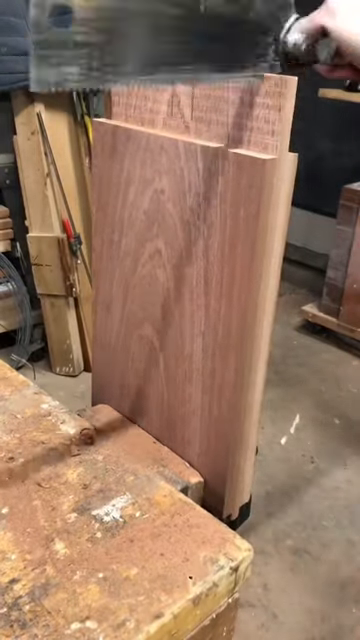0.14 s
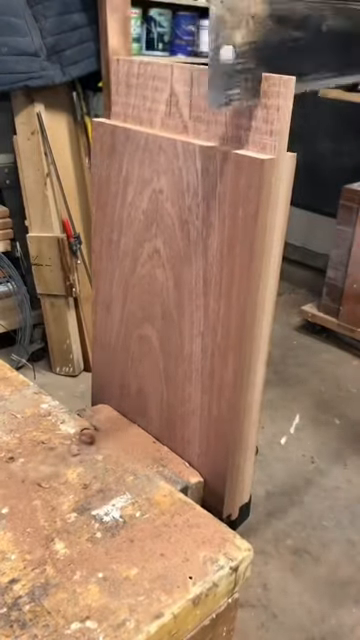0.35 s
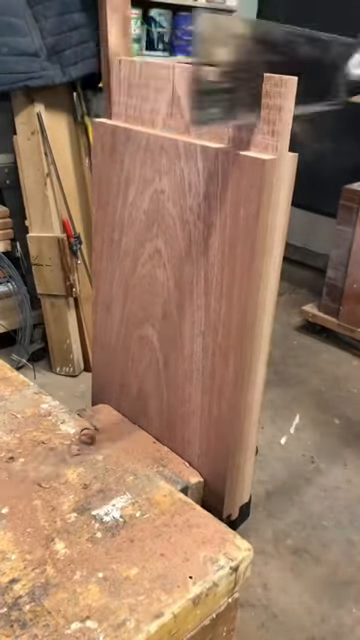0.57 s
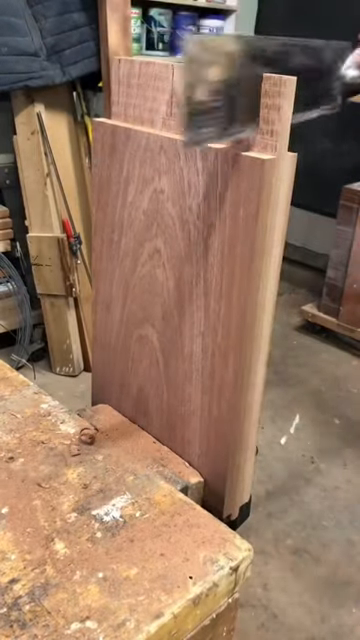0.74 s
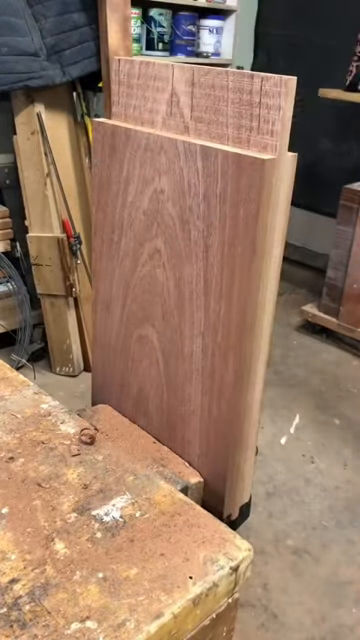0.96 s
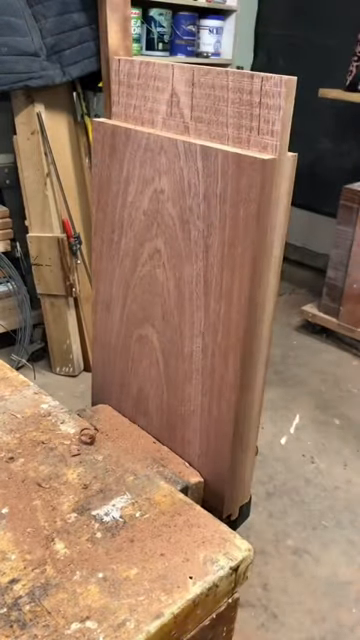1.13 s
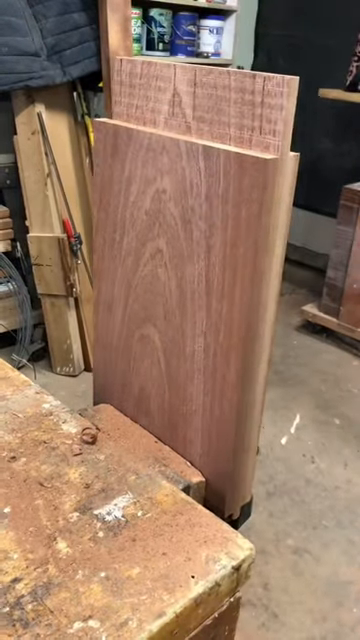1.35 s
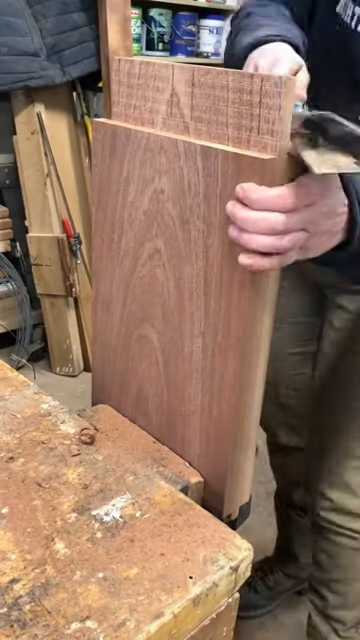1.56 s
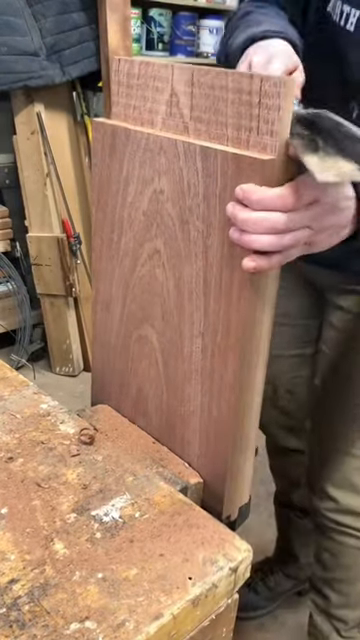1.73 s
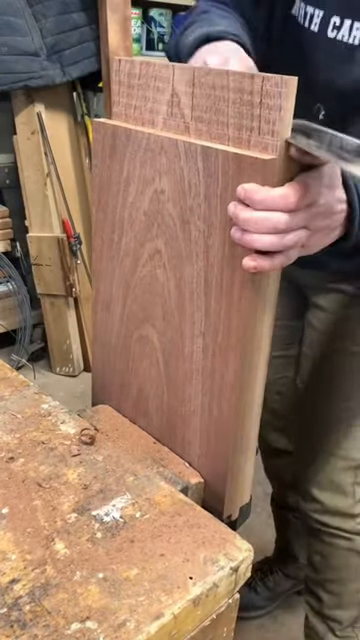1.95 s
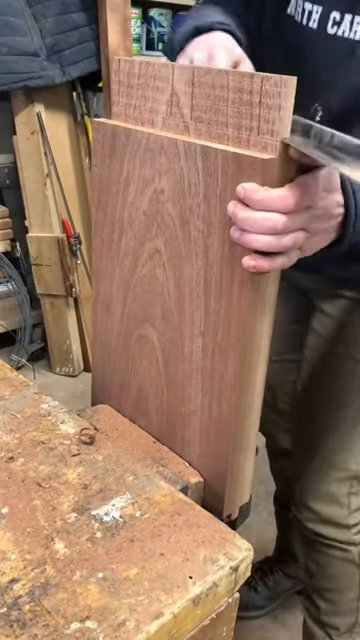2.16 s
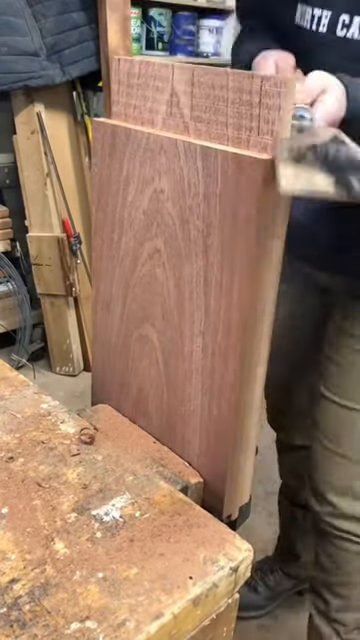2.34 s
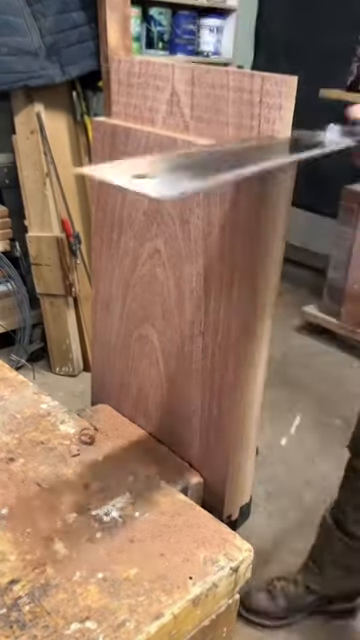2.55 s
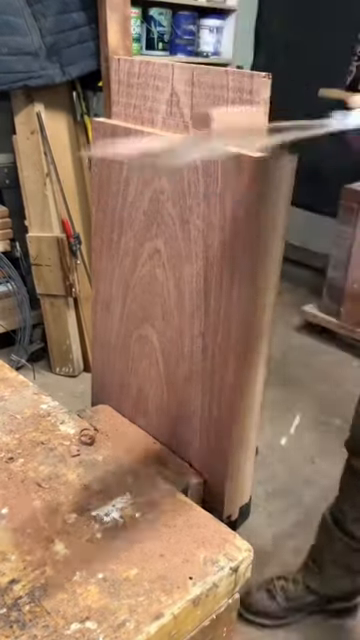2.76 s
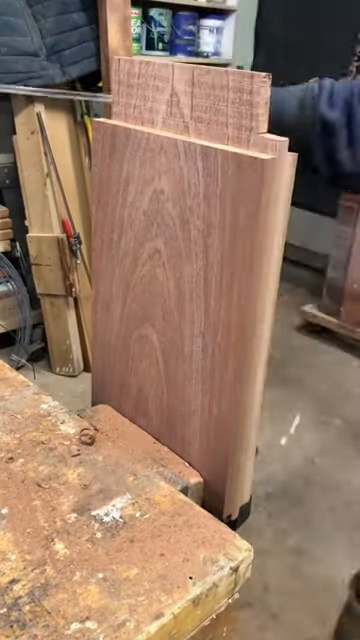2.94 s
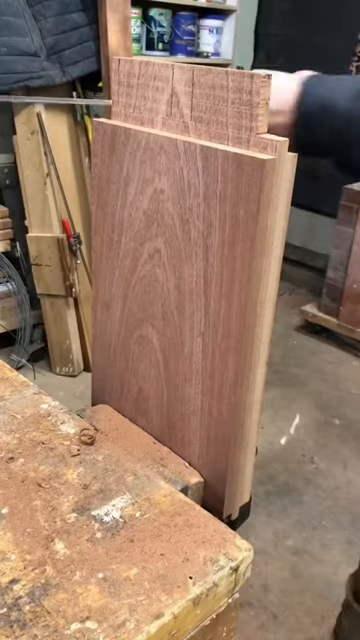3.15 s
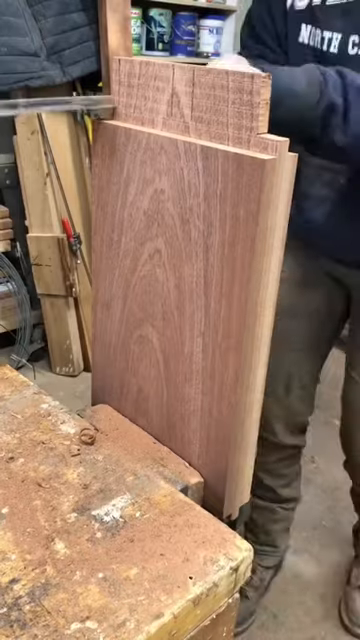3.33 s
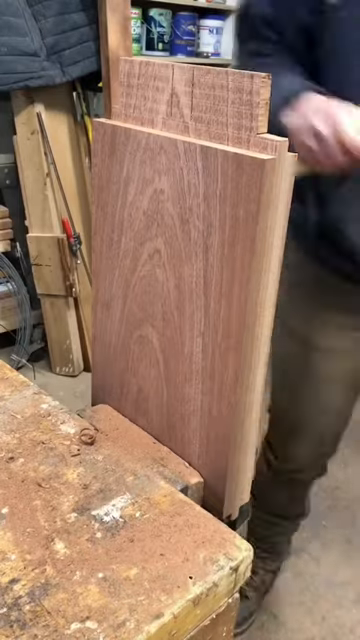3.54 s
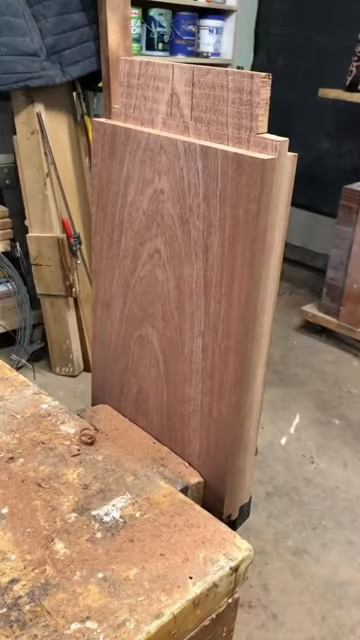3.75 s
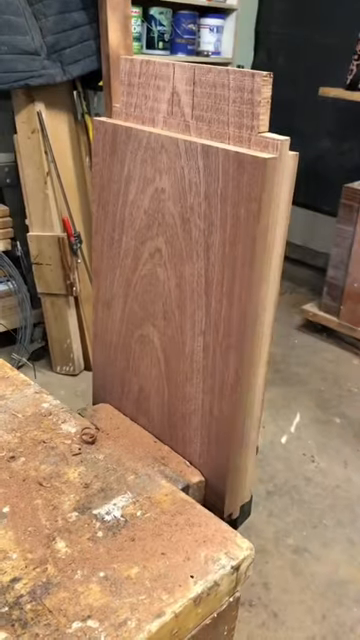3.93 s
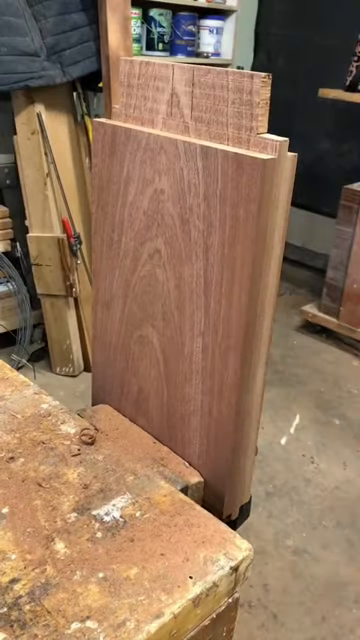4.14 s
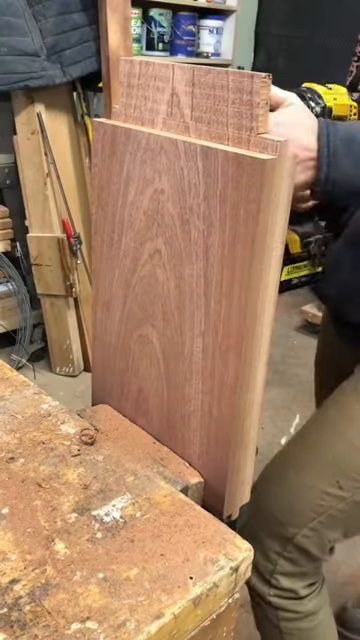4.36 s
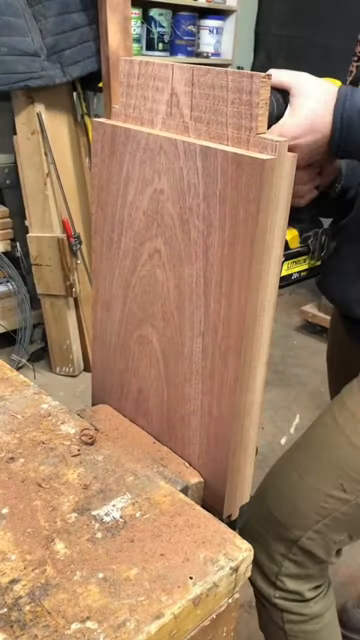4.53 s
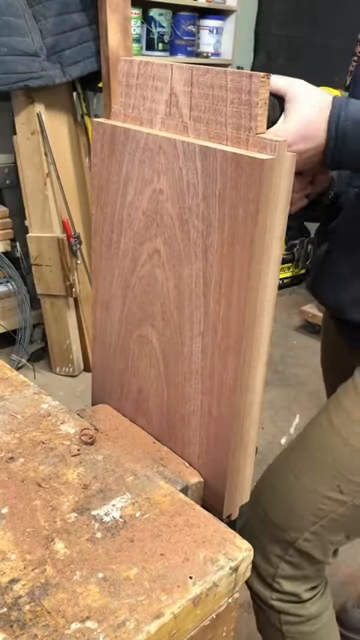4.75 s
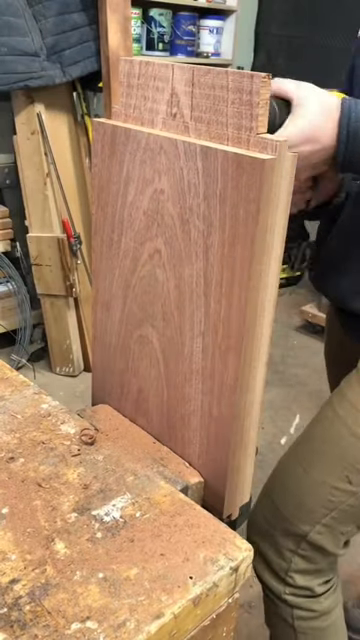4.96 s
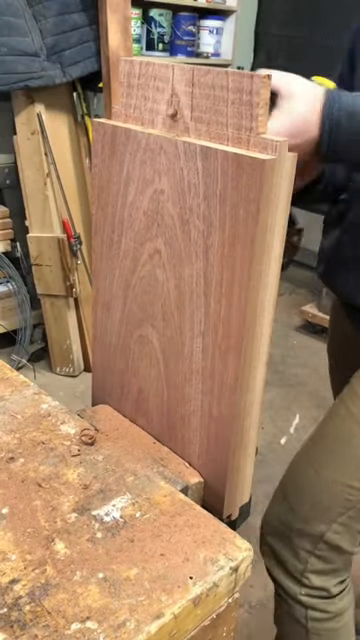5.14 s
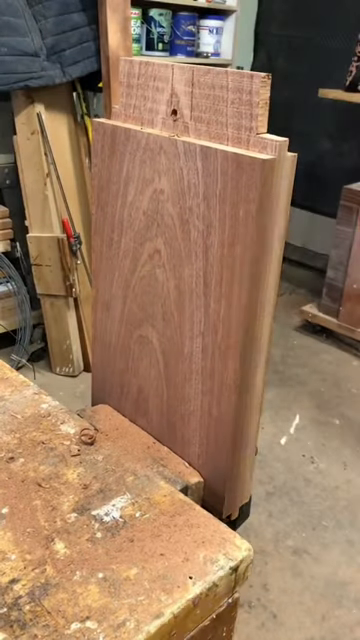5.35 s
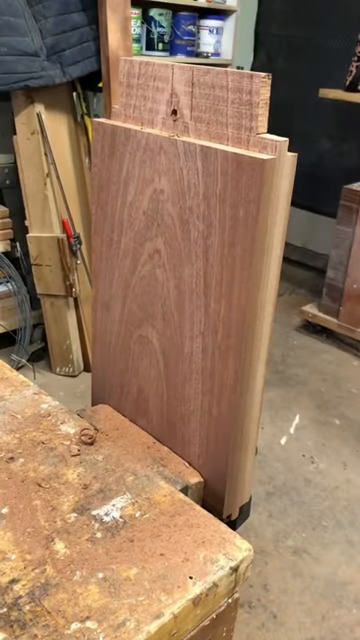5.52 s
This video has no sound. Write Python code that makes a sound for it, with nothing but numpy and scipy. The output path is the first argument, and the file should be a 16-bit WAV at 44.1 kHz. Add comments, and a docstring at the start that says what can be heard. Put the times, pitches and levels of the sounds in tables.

```python
"""Sped-up woodwork in a small workshop, over a steady, faintly whining hiss.
First a thin hand saw makes four cuts in a clamped board: very fast strokes, whose teeth rasp the wood
and ring the blade. Thumps and steel ticks fall among them. Then a cordless drill bores a hole and backs out:
its motor and gears whine, its chuck rattles and its bit tears chips. A few light taps end the scene.
Notes are sines or fuzzy lines; rasps, hisses and knocks are noise or snaps sent through resonances."""
import sys
import numpy as np
from scipy import signal
from scipy.fft import rfft, irfft, next_fast_len
from scipy.io import wavfile
from scipy.ndimage import map_coordinates

SR = 44100
rng = np.random.default_rng(int(sys.argv[2]) if len(sys.argv) > 2 else 0)


def master_out(mix):
    """Clip the mix to full scale and print it as 16-bit PCM to the path in sys.argv[1]."""
    frames = np.transpose(np.atleast_2d(mix))
    ceiling = np.clip(frames, -1, 1)
    pcm = np.round(ceiling * 32767).astype(np.int16)
    wavfile.write(sys.argv[1], SR, pcm)


N = 250929
T = np.arange(N) / SR  # time of each sample in seconds


def amp(db):
    """Turn decibels into a plain multiplier."""
    return 10 ** (np.asarray(db) / 20)


def unit(x):
    """Scale a sound to rms 1."""
    return x / np.sqrt(np.mean(x ** 2) + 1e-20)


def noise():
    """White noise of rms 1 for the whole scene."""
    return rng.standard_normal(N)


def wobble(rate):
    """A smooth random curve, rate knots a second."""
    knots = rng.standard_normal(int(N * rate / SR) + 4)
    return map_coordinates(knots, [T * rate])


def curves(rows):
    """One value per sample for each column after the time, gliding from row to row."""
    seconds, *columns = np.transpose(rows)
    return [np.interp(T, seconds, column) for column in columns]


def body(colour, modes=(), band=(1, SR)):
    """Causal impulse response of energy 1: a broad colour, lifted at each resonance, within a band."""
    hz = np.fft.rfftfreq(8192, 1 / SR) + 1
    colour_hz, colour_db = np.transpose(colour)
    db = np.interp(np.log(hz), np.log(colour_hz), colour_db)
    db += sum(lift / (1 + (2 * (hz - centre) / width) ** 2) for centre, width, lift in modes)
    low_edge, high_edge = 1 + (band[0] / hz) ** 16, 1 + (hz / band[1]) ** 16
    gain = amp(db - db.max()) / np.sqrt(low_edge * high_edge)
    # folding the cepstrum puts the energy as early as possible (minimum phase)
    cepstrum = irfft(np.log(gain + 1e-5))
    half = len(cepstrum) // 2
    cepstrum[1:half] *= 2
    cepstrum[half + 1:] = 0
    response = irfft(np.exp(rfft(cepstrum)))[:half]
    return response / np.linalg.norm(response)


def through(x, response):
    """Let a sound drive a resonating thing."""
    return signal.fftconvolve(x, response)[:N]


def tone(hz, waver=.5):
    """A sine of rms 1 with an unsteady phase."""
    return np.sqrt(2) * np.sin(2 * np.pi * np.cumsum(hz) / SR + waver * wobble(200))


def narrow(hz, width):
    """A fuzzy line of rms 1 that follows a moving frequency."""
    phase = 2 * np.pi * np.cumsum(hz) / SR
    return unit(wobble(width) * np.cos(phase) + wobble(width) * np.sin(phase))


# Broad colour of the hiss. Each row: frequency in Hz, relative level in dB.
AIR_COLOUR = [(30, -46.5), (130, -43.5), (280, -27.5), (400, -22.5), (500, -3), (1000, -9.5), (2000, 4),
              (3500, 5.5), (5500, -0.5), (7200, -8.5), (9500, -7.5), (12000, -10), (15500, -8)]
# Resonances in the hiss. Each row: frequency in Hz, width in Hz, lift in dB.
AIR_RESONANCES = [(580, 120, 6), (762, 150, 17.5), (1134, 110, 13.5), (2644, 214, 13), (6400, 400, 6.5),
                  (8230, 1400, 8), (11750, 2400, 9)]
# Notes of the running machine. Each row: frequency in Hz, level in dB.
MACHINE_NOTES = [(523, -74), (6298, -77.5), (9426, -87.5), (9948, -94), (10476, -75), (10998, -66),
                 (13614, -77)]


def workshop():
    """Steady hiss with a few room resonances and the thin whine of a running machine."""
    hiss = amp(-53.0 + 0.18 * wobble(13)) * through(noise(), body(AIR_COLOUR, AIR_RESONANCES))
    whine = np.zeros(N)
    for hz, db in MACHINE_NOTES:
        level = amp(db + 0.91 * wobble(8.0))
        whine += level * np.sqrt(2) * np.sin(2 * np.pi * hz * T + .5 * wobble(5.3))
    return hiss + whine


def room(x, t60=0.083):
    """The short answer of the crowded walls: a burst of noise that fades by 60 dB in t60 seconds."""
    t = T[:SR // 4]
    tail = rng.standard_normal(len(t)) * amp(-60 * t / t60) * (t > .002)
    return through(x, tail / np.linalg.norm(tail))


# Resonances of the board, then of the blade. Each row: frequency in Hz, width in Hz, lift in dB.
BOARD_RESONANCES = [(585.5, 44, 4.5), (579, 119, 16), (812, 245, 18), (1026, 47, 10), (1202, 24, 7),
                    (1260, 125, 10), (1460, 73, 9), (1570, 108, 10), (1720, 66, 11), (2053, 260, 9),
                    (2380, 45, 5), (2447, 69, 8.5), (3010, 280, 9), (3385, 78, 12), (3822, 156, 12),
                    (4150, 137, 10), (4670, 220, 9), (5216, 270, 8.5)]
BLADE_RESONANCES = [(7210, 95, 7), (7700, 42, 3.1), (7730, 70, 4.9), (7810, 380, 7.5), (7876, 160, 4.7),
                    (8500, 43, 2.4), (8290, 150, 9.1), (9100, 190, 2.4), (9550, 120, 3), (9990, 260, 1.6),
                    (10050, 390, 2.2), (10180, 550, 6.4), (10940, 220, 1.7), (11100, 230, 3.3)]
# Thumps in the board: bumps of tools and hands, a hard bite of the saw, chatter of the drill bit.
# Each row: start in seconds, level in dB, time to fade 60 dB in seconds.
BOARD_THUMPS = [(.49, -32, 0.028), (.562, -32.5, .033), (1.553, -40.5, 0.03), (3.09, -44, 0.088),
                (3.128, -30, 0.039), (3.66, -52, 0.043), (4.127, -49, 0.033), (4.242, -51, .03),
                (4.841, -41.5, 0.032), (5.065, -47, .13), (5.111, -41.5, 0.12), (5.164, -31, 0.04),
                (5.4, -48.5, 0.047), (5.437, -42, 0.037), (5.47, -46, 0.027)]
# Sharp ticks of steel. Each row: start in seconds, level in dB.
STEEL_TICKS = [(.374, -37.5), (0.392, -32), (0.56, -26), (2.809, -33), (2.821, -34.5), (2.877, -46),
               (4.84, -45), (4.936, -43), (5.007, -44), (5.532, -49)]
THUMP_RISE = 0.045  # longer-fading thumps rise more slowly: rise time as a share of the fade time


def knocks(tick_t60=0.0087):
    """Thumps are short bursts of force into the board; ticks ring the steel."""
    thumps, ticks = np.zeros((2, N))
    for start, db, t60 in BOARD_THUMPS:
        age = (T - start) / t60
        thumps += amp(db - 60 * np.maximum(age - THUMP_RISE, 0)) * np.clip(age / THUMP_RISE, 0, 1)
    for start, db in STEEL_TICKS:
        ticks += amp(db - 60 * np.abs(T - start) / tick_t60) * (T >= start)
    wood_colour = [(200, -31.5), (550, -4.5), (850, -6.5), (1500, -1.0),
                   (4000, -3.0), (9000, -2.5), (15000, -18.5)]
    steel_colour = [(300, -33), (700, -21), (5000, -16), (8000, -1.0), (14000, -5.5)]
    wood = body(wood_colour, BOARD_RESONANCES)
    steel = body(steel_colour, BLADE_RESONANCES)
    return through(thumps * noise(), wood) + through(ticks * noise(), steel)


# Trigger pulls. Each row: start in seconds, end in seconds, gear level in dB, starting rattle in dB.
TRIGGER_PULLS = [(4.038, 4.061, -53, -39), (4.39, 4.408, -48, -46), (4.432, 4.909, -46, -47),
                 (4.958, 4.984, -47, -53), (5.043, 5.176, -46, -42)]
# The drill at work. Each row: time in seconds, gear whine in Hz, and the whine and
# boring levels in dB (each about 1 dB lower once mixed).
DRILL_WORK = [(4.41, 3803, -74, -62), (4.46, 3810, -59, -58), (4.51, 3793, -55.5, -46),
              (4.835, 3670, -52.5, -44.5), (4.85, 3560, -46, -42), (4.895, 3530, -42, -44.5),
              (4.915, 3330, -57, -54), (5.05, 3610, -64, -54), (5.12, 3910, -64, -43.5),
              (5.18, 3880, -62, -69)]
# Broad colours of the gear hiss and of the boring. Each row: frequency in Hz, relative level in dB.
GEAR_COLOUR = [(240, -61), (400, -37), (527, -18), (810, -10), (1380, -10.5), (1720, 1), (2330, -20),
               (3750, -4), (6120, -14.5), (8190, 3), (9410, -13), (13000, -3), (15600, -8.5)]
BORING_COLOUR = [(180, -86), (300, -51), (572, -21), (721, -22), (783, 0), (1110, -24), (1220, 3.5),
                 (1400, -25), (1730, -25), (2750, -2.5), (3640, -2), (6080, -10), (8190, 3), (9660, -4),
                 (15600, -6.5)]
# Resonances of the loose chuck. Each row: frequency in Hz, width in Hz, lift in dB.
CHUCK_RESONANCES = [(4940, 700, 15.5), (6530, 490, 9), (13100, 1100, 8)]
MOTOR_PER_WHINE, MOTOR_DB = .54, -59.5  # the motor's note is geared to the whine
SPIN_UP_S, START_SLOW = .068, .17  # at each pull the motor starts slow by this share
# the bit squeals as it breaks through: start, pitch, level and time to fade 60 dB
SQUEAL_S, SQUEAL_HZ, SQUEAL_DB, SQUEAL_T60 = 4.84, 4040, -45, 0.38


def drill(rise=0.0083, fall=0.0046, rattle_t60=0.16):
    """While the trigger is held the motor spins up, the gears hiss and whine, and the bit tears chips."""
    whine_hz, whine_db, boring_db = curves(DRILL_WORK)
    running, effort, jolt, starting = np.zeros((4, N))
    for start, end, gear_db, rattle_db in TRIGGER_PULLS:
        gate = np.clip((T - start) / rise, 0, 1) * np.exp(-np.maximum(T - end, 0) / fall)
        running += gate
        effort += gate * amp(gear_db)
        jolt += gate * amp(rattle_db - 60 * np.abs(T - start) / rattle_t60)  # each start shakes the chuck
        slowness = np.exp(-((T - start) / SPIN_UP_S) ** 4)
        starting = np.where(T >= start, slowness, starting)
    motor_hz = MOTOR_PER_WHINE * whine_hz * (1 - START_SLOW * starting)

    gears = amp(-1.0) * through(unit(noise() * amp(3 * wobble(900))), body(GEAR_COLOUR))
    gears += amp(-12) * narrow(3.48 * whine_hz, width=260)
    chuck_colour = [(300, -45), (2000, -12), (5000, -7.0), (15000, -4.0)]
    chuck = through(noise(), body(chuck_colour, CHUCK_RESONANCES))
    whine = amp(whine_db) * (0.92 * tone(whine_hz, waver=.2) + 0.2 * narrow(whine_hz, width=210))
    motor_overtone = amp(-2.5) * narrow(2.78 * motor_hz, width=180)
    motor = amp(MOTOR_DB) * (tone(motor_hz, waver=0.8) + motor_overtone)
    tearing = unit(noise() * amp(2.8 * wobble(1200)))
    chips = amp(boring_db - 1) * through(tearing, body(BORING_COLOUR))
    squeal_level = (T >= SQUEAL_S) * amp(SQUEAL_DB - 60 * np.abs(T - SQUEAL_S) / SQUEAL_T60)
    squeal = squeal_level * narrow(np.full(N, SQUEAL_HZ), width=450)
    return effort * gears + jolt * chuck + running * (whine + motor + chips + squeal)


# Broad colours of the rip cut, the light and the heavy part of the cross cut, and the last cut.
# Each row: frequency in Hz, relative level in dB.
RIP_TOP = [(280, -37), (400, -18.5), (560, -17), (1000, -11.5), (1600, -9.5), (2200, -5), (3300, -14.5),
           (4200, -10.5), (6200, -12), (7800, -3), (9200, -2), (10700, -3.5), (12500, -10), (15600, -10.5)]
CROSS_LIGHT = [(280, -32.5), (400, -25), (560, -21.5), (1000, -7), (1600, -11.5), (2200, -4), (3300, -5.5),
               (4200, -1), (6200, -7.5), (7800, -4), (9200, -1), (10700, -1.5), (12500, -6), (15600, -6)]
CROSS_HEAVY = [(280, -27), (400, -13.5), (560, -4.5), (1000, -8.5), (1600, 0.5), (2200, -7), (3300, -7.5),
               (4200, -11.5), (6200, -7.5), (7800, -7), (9200, -2), (10700, -2.5), (12500, -3), (15600, -4)]
RIP_SIDE = [(280, -42), (400, -15), (560, -15.5), (1000, -7.5), (1600, -4.5), (2200, -14), (3300, -8),
            (4200, -11.5), (6200, -12), (7800, -5), (9200, -10), (10700, 2.5), (12500, -1), (15600, -8.5)]
# The four cuts. Each row: start in seconds, end in seconds, broad colour (one of the tables above).
SAW_CUTS = [(0, 1, RIP_TOP), (1, 2.48, CROSS_LIGHT), (2.48, 3, CROSS_HEAVY), (3, 4, RIP_SIDE)]
# Runs of strokes at an even tempo; each opens with a return stroke, then cutting and return strokes alternate.
# Each row: start and end in seconds, number of strokes, board and blade levels of a cutting stroke in dB,
# change of board and of blade level on the return in dB, swell across the run in dB,
# basic tooth rate cutting and returning in teeth per second, share of the tooth note in light strokes (0-1).
STROKE_RUNS = [(0, .064, 2, -43, -30.5, -4, -7, -4, 1600, 891.8, 0.22),
               (.067, .351, 8, -37.5, -30, -8.5, -6, 1, 860, 1569, 0.21),
               (0.392, 0.605, 6, -38.5, -30, -7, -8, -4, 850, 1546, 0.15),
               (.611, 0.763, 4, -39.5, -33.5, -6.5, -3.5, -2.5, 885, 1460, .16),
               (0.766, 0.905, 4, -44, -35.5, -5, -4.5, -6.5, 870, 867, 0.12),
               (1.645, 1.788, 8, -46.5, -47.5, -2.5, -5.5, 12, 1540, 1184, .2),
               (1.787, 1.914, 7, -43.5, -37.5, -6.5, -6, 3, 1580, 1131, 0.35),
               (1.929, 2.014, 4, -47, -39.5, -2, -6, 4, 1350, 1250, .25),
               (2.014, 2.12, 5, -43.5, -39, 2.5, -6, 0, 1425, 1260, .68),
               (2.142, 2.184, 2, -45, -38.5, -7, -12, 2, 1440, 1100, .65),
               (2.184, 2.291, 5, -42, -36.5, 0, -8.5, -1, 1420, 1190, 0.84),
               (2.321, 2.461, 6, -42.5, -38, -3.5, 1, -0.5, 1520, 1379, 0.073),
               (2.462, 2.595, 6, -30.5, -40, -10, -1, 5, 1090, 1575, 0.8),
               (2.599, 2.67, 4, -31, -37.5, -7.5, -3.5, 2, 1090, 1565, 0.79),
               (2.67, 2.79, 5, -33.5, -39, -10, -2.5, -13.5, 1250, 1557, 0.58),
               (3.054, 3.078, 1, -43, -56, -2, 0, 5, 1350, 1350, .19),
               (3.103, 3.153, 3, -40.5, -47.5, -1.5, 0.5, 2, 1675, 1398, 0.22),
               (3.15, 3.249, 6, -41, -43, -6, -1.5, -3.5, 1570, 1397, 0.42),
               (3.249, 3.362, 6, -45, -45, 0, 5, -3, 1420, 1350, 0.14),
               (3.362, 3.468, 6, -38.5, -44.5, -2, 5, 1, 1720, 960, 0.72)]
# How the saw sits in each cut. Each row: rasp offset in dB, place of the hardest push cutting
# and returning (0-1 along the stroke), ring of the blade in the kerf in Hz, its share in light strokes (0-1).
SAW_GRIP = [(-0.5, .38, .45, 3055, 0.3), (-5.5, .53, .52, 3400, 0.007), (-5, .48, 0.27, 1700, 0.12),
            (0.5, 0.51, .47, 3350, 0.35)]
# How strongly board, rasp and blade follow the speed of a stroke: one exponent each, no unit.
SPEED_EXPONENTS = [1, 0.71, 1]
RASP_GROWS, FIRM_DB = 1.326, -39  # the rasp swings this much wider than the board, about a firm stroke
UNEVEN_DB, UNEVEN_SPEED = 0.82, .02  # no two strokes are alike: random spread of level and of speed (share)


def stroke_speed(travel, peak):
    """Speed along one stroke: from rest up to 1 at the peak and back to rest."""
    bent_travel = np.interp(travel, [0, np.clip(peak, .1, .9), 1], [0, .5, 1])
    return np.abs(np.sin(np.pi * bent_travel))


def strokes(speed_arch=.27, bite=0.11, drag=0.024):
    """Each stroke speeds up, slows and turns: gives its force in three bands, the tooth rate and how it rings."""
    force, tooth_hz, ringing = np.zeros((3, N)), np.full(N, 500.), np.zeros((3, N))
    for (start, end, count, board_db, blade_db, board_return_db, blade_return_db,
         swell_db, cut_hz, return_hz, singing) in STROKE_RUNS:
        cut = sum((start + end) / 2 > until for _, until, _ in SAW_CUTS)
        rasp_db, cut_peak, return_peak, kerf_hz, kerf_share = SAW_GRIP[cut]
        count = round(count)
        turns = np.linspace(start, end, count + 1)
        for k, (harder, faster) in enumerate(rng.standard_normal((count, 2))):
            returning = k % 2 == 0
            peak, full_hz = (return_peak, return_hz) if returning else (cut_peak, cut_hz)
            span = slice(*np.searchsorted(T, turns[k:k + 2]))
            travel = np.linspace(0, 1, len(T[span]))
            effort_db = swell_db * ((k + .5) / count - .5) + UNEVEN_DB * harder
            board = board_db + effort_db + returning * board_return_db
            blade = blade_db + effort_db + returning * blade_return_db
            rasp = FIRM_DB + rasp_db + RASP_GROWS * (board - FIRM_DB)
            # the board answers as soon as the teeth bite, the blade a little later
            peaks = (peak - bite, peak - bite / 2, peak)
            shapes = [unit(stroke_speed(travel, at) ** arch + drag) for at, arch in zip(peaks, SPEED_EXPONENTS)]
            force[:, span] = amp([board, rasp, blade])[:, None] * shapes
            speed = (stroke_speed(travel, peak) + .06) ** speed_arch
            tooth_hz[span] = full_hz * (1 + UNEVEN_SPEED * faster) * speed
            ringing[:, span] = [[singing], [kerf_share], [kerf_hz]]
    return force, tooth_hz, ringing


def teeth(tooth_hz, jitter, scatter_db):
    """One snap of uneven size each time a tooth meets the wood."""
    passed = np.floor(np.cumsum(tooth_hz * (1 + jitter * wobble(700))) / SR)
    snaps = (np.diff(passed, prepend=0) > 0) * amp(scatter_db * np.minimum(noise(), 2))
    return unit(snaps / np.sqrt(tooth_hz))


# The waste piece rings lower as the kerf frees it, in the cross cut and in the last cut.
# Each row: time in seconds, frequency in Hz, level relative to the blade force in dB.
WASTE_RING = [(1.7, 16000, -14), (2.05, 15600, -14), (2.26, 13900, -14), (2.34, 12600, -13),
              (2.45, 10000, -3), (2.56, 7500, -3), (2.68, 3300, -8), (2.79, 2900, -12), (3.05, 11300, -7),
              (3.3, 11100, -5), (3.47, 10300, -5)]
# Bands of the board, the rasp and the blade. Each row: low edge in Hz, high edge in Hz.
FORCE_BANDS = [(20, 2200), (2200, 6500), (6500, 20000)]


def saw(tearing_db=-32):
    """Tooth snaps and tearing fibres drive the board and the blade; light strokes sing at the tooth rate."""
    force, tooth_hz, (singing, kerf_share, kerf_hz) = strokes()
    force = force * unit(amp(1.13 * wobble(170)))  # the teeth catch and let go
    smooth = 1 / (1 + (force[0] / amp(tearing_db)) ** 4)  # hard pushes tear instead of singing
    sing, ring = smooth * np.clip([singing, kerf_share], 0, .9)
    note = force[0] * np.sqrt(sing) * tone(tooth_hz, waver=0.7) * unit(amp(3 * wobble(220)))
    kerf = force[1] * np.sqrt(ring) * narrow(kerf_hz, width=260)

    snaps = teeth(tooth_hz, jitter=.09, scatter_db=5.5)
    fibres = unit(noise() * amp(2.04 * wobble(1500)))
    pushes = [force[0] * np.sqrt(1 - sing), force[1] * np.sqrt(1 - ring), force[2]]
    resonances = list(BOARD_RESONANCES) + list(BLADE_RESONANCES)
    rasp = np.zeros(N)
    for push, snap_share, band in zip(pushes, [.5, .3, .15], FORCE_BANDS):
        drive = push * (np.sqrt(snap_share) * snaps + np.sqrt(1 - snap_share) * fibres)
        for start, end, colour in SAW_CUTS:
            full_colour = [(100, -47.0), (200, -50)] + list(colour)  # little sound in the deep bass
            rasp += through(drive * (T >= start) * (T < end), body(full_colour, resonances, band))

    waste_hz, waste_db = curves(WASTE_RING)
    waste = force[2] * amp(waste_db) * narrow(waste_hz, width=700)
    return note + kerf + rasp + waste


def scene():
    """Saw, drill and knocks close by, in the small room."""
    work = knocks() + drill() + saw()
    return (workshop() + amp(-13) * room(work) + work)[None]


TOP_HZ = 15800  # band limit


def record(dry):
    """Nothing is kept above the band limit."""
    size = next_fast_len(N + SR // 2)
    kept = np.fft.rfftfreq(size, 1 / SR) < TOP_HZ
    return irfft(rfft(dry, size) * kept, size)[..., :N]


dry = scene()
out = record(dry)
master_out(out)
```